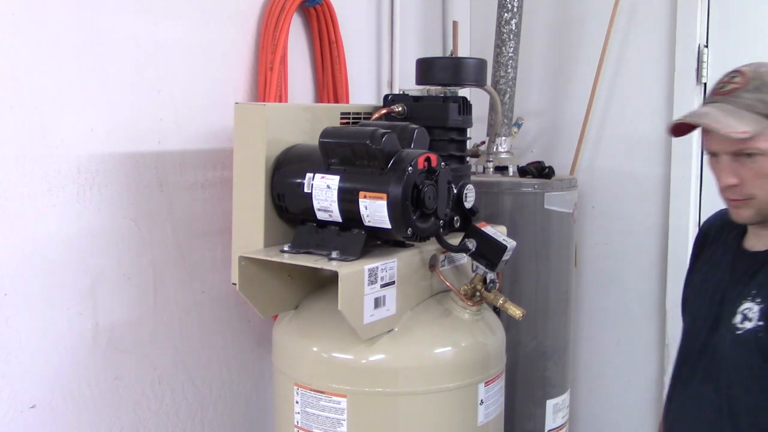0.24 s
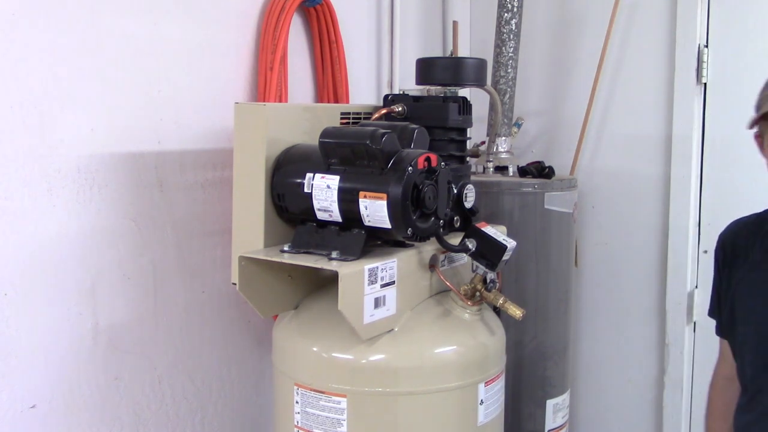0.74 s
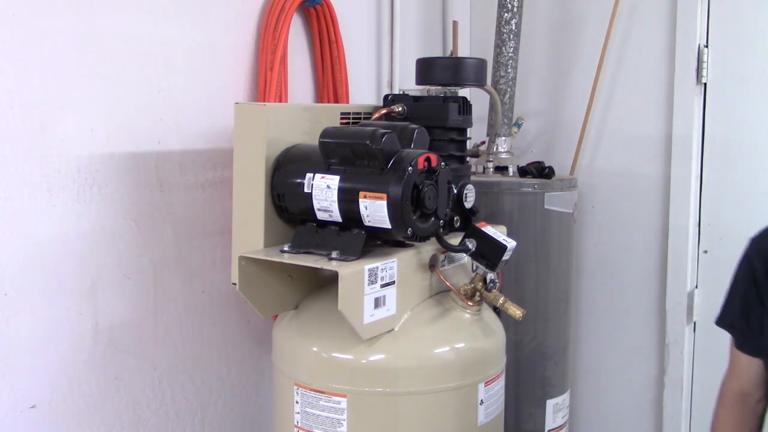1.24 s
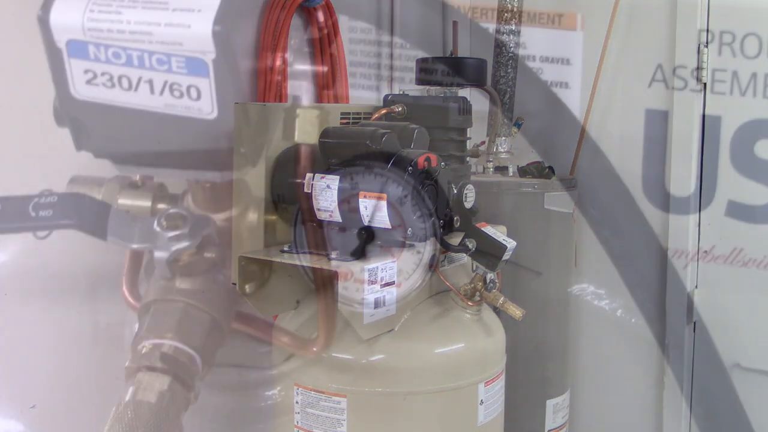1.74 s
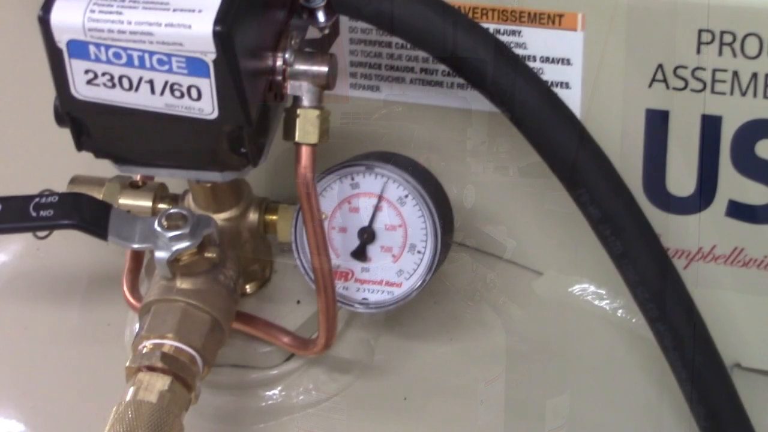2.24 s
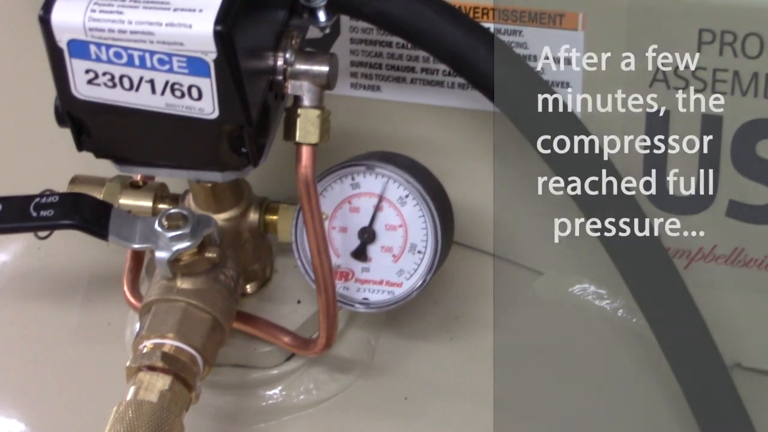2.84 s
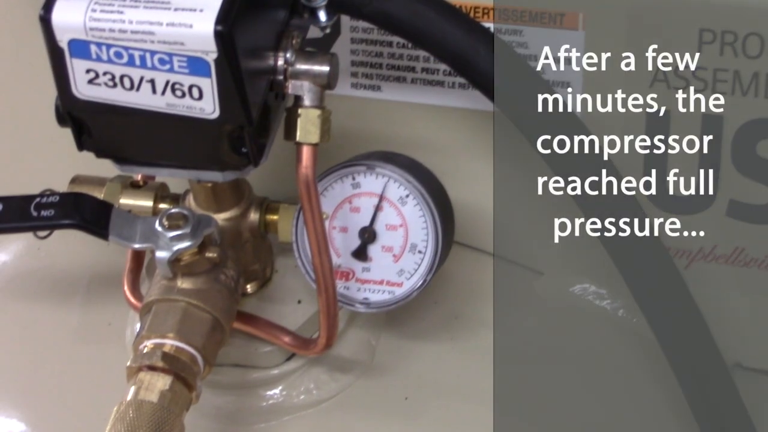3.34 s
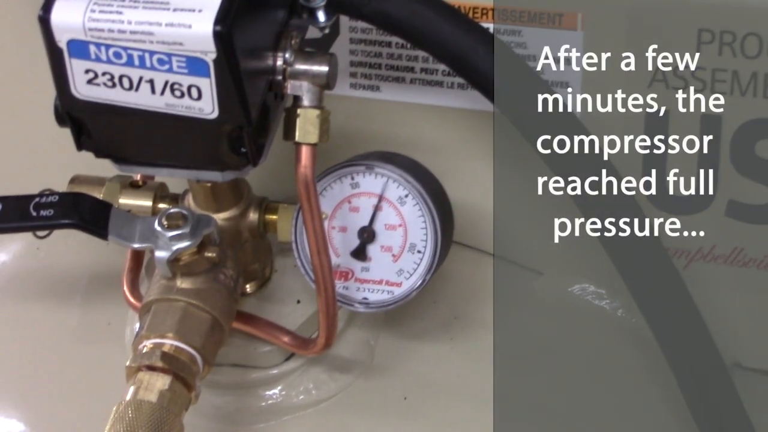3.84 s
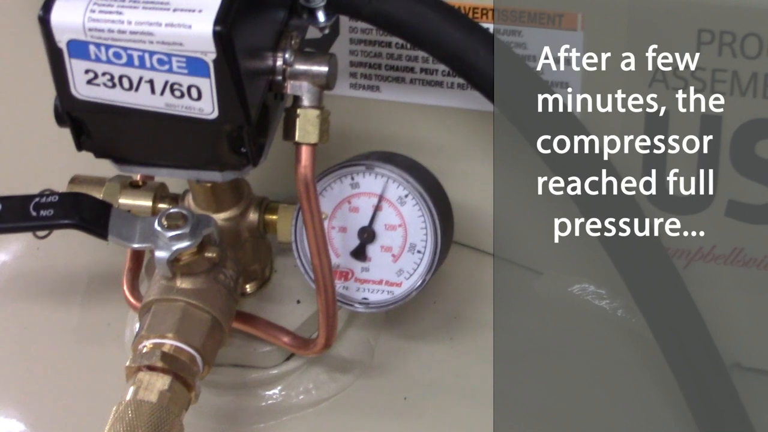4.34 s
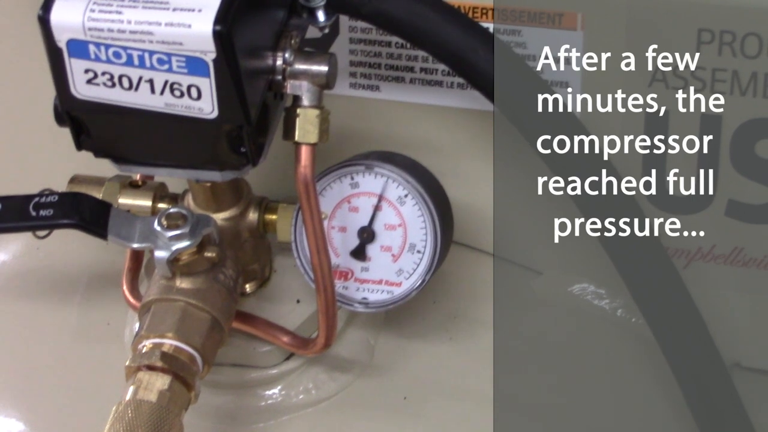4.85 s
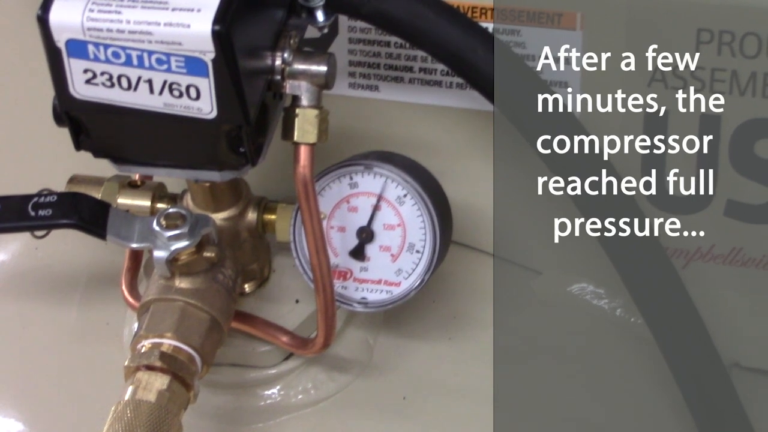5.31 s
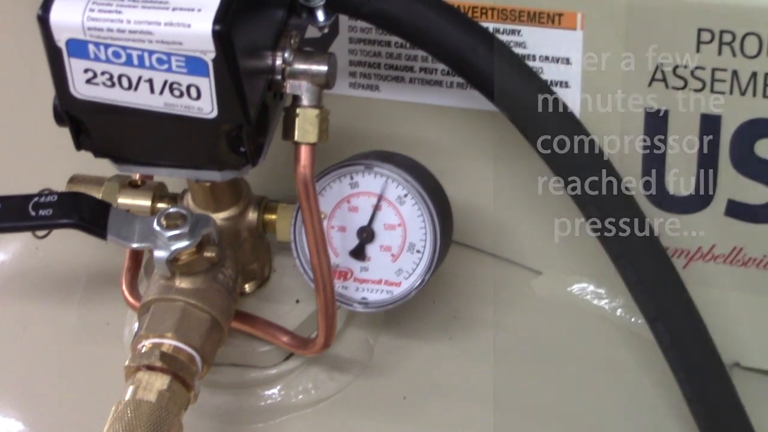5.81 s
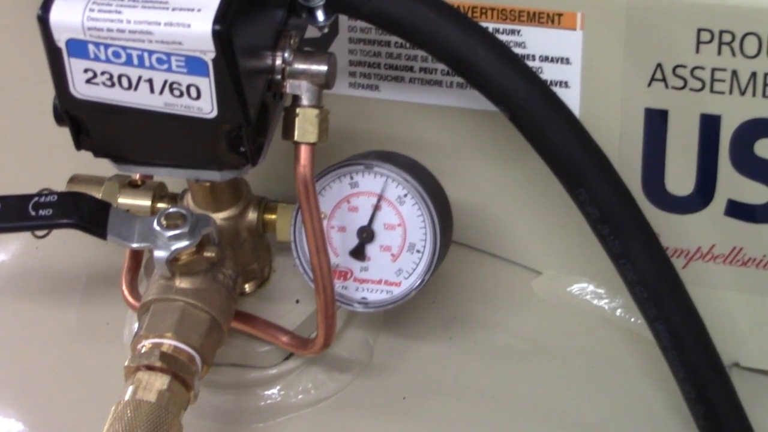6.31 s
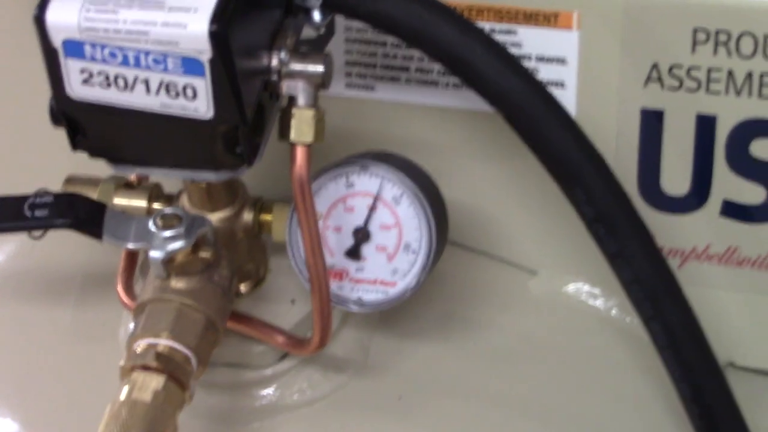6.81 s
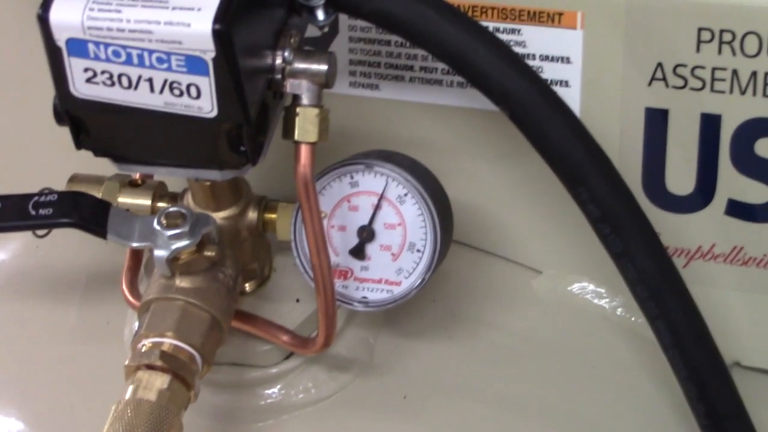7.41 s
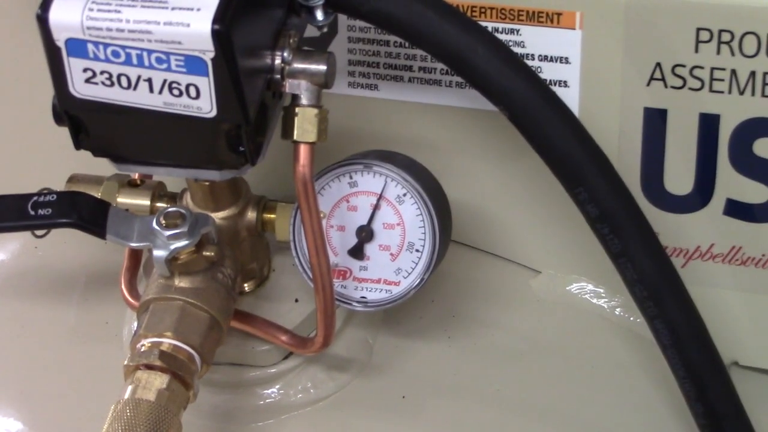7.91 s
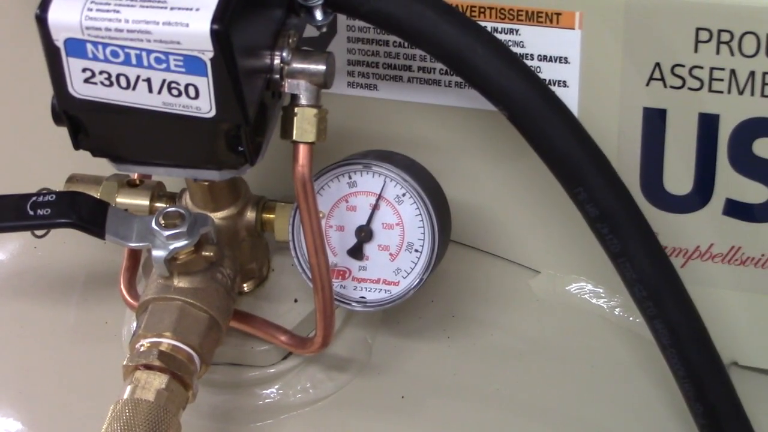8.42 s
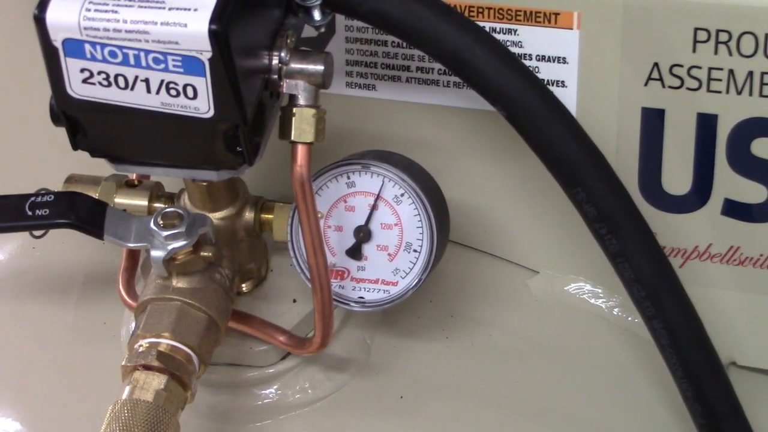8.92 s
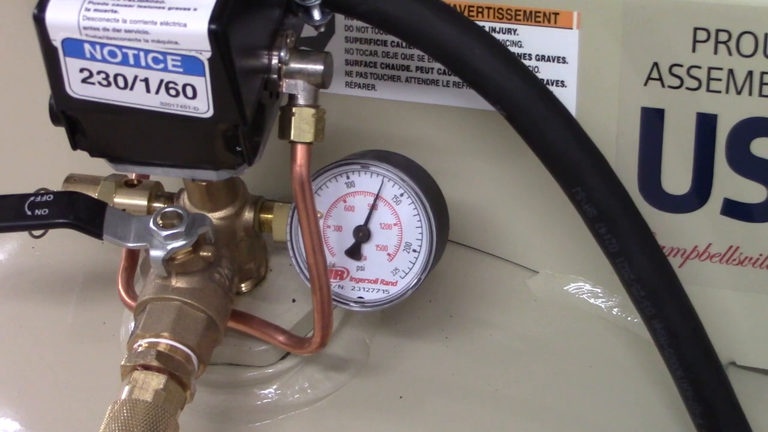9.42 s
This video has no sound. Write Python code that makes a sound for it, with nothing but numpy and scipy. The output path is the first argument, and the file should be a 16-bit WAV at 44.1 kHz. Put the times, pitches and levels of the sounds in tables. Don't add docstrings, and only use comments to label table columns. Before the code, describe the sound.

From 0 seconds an electric piston air compressor is already running loudly in a garage, heard across the room: a steady hammering drone of about 25 turns per second, with slapping valves, rattling metal and broadband clatter. At about 1.9 seconds a tiny click cuts to a close position by the tank; the same drone becomes rougher and more midrange, with faint reed ticks and thin, wavering belt squeals around 5 kilohertz. At 6.6 seconds the motor switches off. Its drone collapses and separate tank thumps alternate with short valve chirps, slowing until a firm knock near 7.4 and small chirps until 7.7. Meanwhile a bright, gritty air hiss bursts out at 6.6, swells slightly, and stays strong from 7.7 to about 9, its upper resonances sinking as pressure falls. It fades rapidly by 9.7, leaving faint building hum.

```python
import sys
import numpy as np
from scipy import signal
from scipy.fft import rfft, irfft, next_fast_len
from scipy.io import wavfile
from scipy.ndimage import uniform_filter1d, minimum_filter1d

SR = 44100
rng = np.random.default_rng(int(sys.argv[2]) if len(sys.argv) > 2 else 0)


def voltage_ratio(level):
    return 10 ** (np.asarray(level, float) / 20)


def wrap_up_sound(samples):
    columns = np.atleast_2d(samples).T
    tamed = np.clip(columns, -1, 1)
    steps = np.round(tamed * 32767).astype(np.int16)
    wavfile.write(sys.argv[1], SR, steps)


N = 426006
T = np.arange(N) / SR

CUT_S, TRIP_S = 1.8662, 6.6095
FAR_HZ, NEAR_HZ = 25.112, 24.728

# (multiple of the crank rate [1], level [dB])
FAR_ORDERS = [(1, -51), (2, -47), (3, -53), (4, -27), (5, -39), (6, -17), (8, -12), (10, -5), (12, -2),
              (13, -13), (14, -8), (16, 0), (18, -9), (19, -12), (20, -10), (21, -9), (22, -8), (23, -15),
              (24, -8), (26, -13), (28, -11), (29, -15), (32, -9), (33, -13), (34, -16), (36, -14),
              (38, -12), (40, -15), (42, -9)]
NEAR_ORDERS = [(8, -11), (9, -7), (10, -4), (11, -8), (12, 0), (13, -15), (14, -1), (15, -10), (16, -2),
               (18, -9), (19, -10), (21, -14), (22, -2), (23, -16), (24, -11), (26, -9), (27, -10),
               (29, -4), (30, -6), (31, -6), (32, -12), (33, -15), (34, -14), (35, -10), (36, -4), (38, -7),
               (40, -11), (42, -12), (43, -10), (44, -8)]
# (multiple
# [1], level [dB])
FAR_PLATES = [(54, -24), (55, -24), (59, -23), (75, -23), (81, -23), (82, -23), (87, -25), (91, -26)]
NEAR_PLATES = [(39, -21), (46, -21), (50, -24), (57, -27), (72, -26), (76, -25), (78, -25), (82, -21),
               (83, -26), (92, -25), (101, -26), (118, -27), (129, -29)]
# (lowest multiples [dB], first radiated multiple [dB], slope [dB per multiple])
FAR_WEAK, NEAR_WEAK = (-32, -17, -.21), (-30, -22, .05)
RADIATES_FROM, LAST_MULTIPLE = 8, 46
DEEPEST_DB = -7
# (crank angle [turns], strength [dB], centre multiple [1], sweep [milliturns per multiple])
FAR_SLAPS = [(0.1781, -5.0, 30.2, 3.54), (0.3402, 5.7, 21.0, -2.85), (0.3616, -0.7, 28.6, 6.84),
             (0.4904, -5.8, 40.9, 4.39), (0.523, 4.1, 12.6, 3.58), (0.5439, 4.6, 17.6, 11.77),
             (0.6526, -2.7, 14.4, 0.34), (0.8903, 0.4, 17.9, 14.0)]
NEAR_SLAPS = [(0.099, 5.9, 42.6, 2.07), (0.1373, 3.7, 37.4, 6.01), (0.2985, -4.1, 38.4, 0.21),
              (0.3757, 3.4, 19.5, 3.67), (0.3915, -0.9, 28.5, -0.72), (0.4075, 3.3, 10.2, 3.91),
              (0.4603, -1.4, 16.5, 7.39), (0.7369, -2.4, 21.1, 6.91), (0.8103, 1.6, 24.6, 3.05)]

# (frequency [Hz], level [dB per Hz])
FAR_RUSH = [(40, -60), (100, -32), (250, 2), (600, -1.5), (1050, -1.5), (1250, -11), (1750, -15.5),
            (2300, -14.5), (3000, -14.5), (4300, -12), (5500, -14), (8000, -21.5), (11000, -31),
            (16000, -41)]
NEAR_RUSH = [(40, -53), (150, -8), (230, -2), (600, 1), (1050, 1.5), (1250, -10), (2000, -14),
             (3000, -16.5), (4300, -18.5), (5500, -15.5), (6400, -21.5), (9000, -27.5), (12900, -35),
             (13400, -37), (16000, -47)]
# (frequency [Hz], width [Hz])
FAR_RINGS = [(1360, 70), (1485, 40), (2050, 80), (2200, 60), (2550, 70), (3350, 90), (3570, 90),
             (4150, 150), (4850, 200)]
NEAR_RINGS = [(2030, 90), (2280, 60), (2490, 60), (2920, 70), (3050, 120), (4690, 60), (5320, 130),
              (6180, 80), (6640, 40), (7130, 120), (8240, 80), (12700, 200), (12900, 300)]

# (time [s], length [s], level [dB])
BELT_SLIPS = [(1.85, 0.054, -52), (2.1, 0.5, -58), (2.79, 0.44, -50.5), (3.58, .06, -53), (3.74, 0.38, -52),
              (4.15, 0.33, -51.5), (4.62, .35, -56), (5.15, 0.21, -56), (5.38, 0.62, -49), (6.0, .38, -53),
              (6.47, 0.17, -55)]
# (frequency [Hz], width [Hz], level [dB])
SQUEAL_TONES = [(5500, 500, -4.5), (5290, 45, 9), (5415, 40, 5.5), (5530, 41, 9), (5760, 38, 10.5),
                (4600, 400, -1)]
GRIP_S, SAG_DB_PER_S, IDLE_SQUEAL_DB = 0.034, -6, -67
# (crank angle [turns], frequency [Hz], width [Hz], level [dB])
TICKS = [(.03, 1980, 440, -41.5), (.05, 9100, 500, -52), (.83, 12800, 900, -71), (.5, 12250, 300, -68)]
TICK_TURNS = 0.021

COAST_S, BRAKE, FIRST_STROKE, VALVE_LAG, STROKE_COUNT = .871, 1.873, .671, .54, 22
BOOM_SPEED, CHIRP_SPEED = .45, .56
# (peak at full speed [dB], peak at rest [dB], pitch at full speed [Hz], pitch at rest [Hz])
BOOM, KNOCK = (-20, -22.5, 310, 146), (-27, -15, 355, 323)
CHIRP_LOW, CHIRP_HIGH = (-22, -30, 706, 730), (-24.5, -27, 920, 902)
# (time [s], peak [dB], pitch [Hz])
LAST_KNOCKS = [
    (7.391, -28.5, 419),
    (7.538, -52, 320),
]
# (time [s], peak [dB], pitch [Hz])
LAST_CHIRPS = [(7.432, -32.5, 804), (7.452, -33, 933), (7.52, -37, 850), (7.56, -39, 810),
               (7.589, -44, 719), (7.672, -37, 844)]
# (frequency [Hz], level [dB], t60 [s])
TANK_MODES = [(226, -7, 0.19), (300, -14, .1), (398, -7.5, 0.14), (539, -12, 0.16)]
HEAD_MODES = [(225, -18, .05), (300, -22, .3), (420, -13, .45), (550, -20, .12)]
VALVE_MODES = [(586, -16, 0.096), (703.4, -12, 0.12), (825, -17.5, 0.2), (950, -11.5, 0.11),
               (1072, -9, 0.062)]

# (time [s], level [dB], emptying [0-1])
BLEED = [
    (6.61, -33, .1),
    (6.8, -30, 0),
    (7.3, -28.5, 0),
    (7.7, -26.5, 0.34),
    (8.1, -26.5, 0.68),
    (8.5, -27, 1),
    (9.02, -27.5, 0.97),
    (9.32, -33, 0.88),
    (9.66, -42.5, 0.7),
]
# (frequency [Hz], width [Hz], level at full pressure [dB], level nearly empty [dB])
TUBE = [(3610, 900, -11.5, -12), (4850, 790, -6, -1), (5620, 750, -14.5, -3), (6890, 1030, -0.5, 0),
        (7980, 340, -10.5, -6.5), (8770, 560, -4, -5), (9760, 980, -6.5, -8.5), (10620, 400, -7.5, -23),
        (11670, 850, -7, -13), (13100, 970, -2.5, -8.5), (15400, 1140, -6.5, -10.5)]
# (frequency [Hz], width [Hz])
NOTCHES = [(3300, 120), (5250, 120), (7400, 180), (10200, 310), (12200, 320), (13950, 340)]
# (frequency [Hz], level [dB])
BREATH = [(60, -25), (200, -12), (560, -8.0), (760, -1.5), (1200, -2.5), (2200, 0.5), (3000, 1), (9000, 5.5),
          (16000, -1)]
# (frequency [Hz], width [Hz])
BREATH_RINGS = [(940, 60), (1160, 74), (2150, 160), (2900, 160)]

# (frequency [Hz], level [dB])
HUM = [(334, -61.5), (736, -58.5), (810, -64), (826, -67)]
# (time [s], gain [dB])
HUM_RISE = [(7.6, -19), (8.03, -8), (8.6, -7.5), (9.66, -8.5)]
# (frequency [Hz], level [dB per Hz])
ROOM_FLOOR = [(30, -105), (100, -99), (300, -99), (800, -94.5), (1500, -93), (4000, -107), (16000, -125)]
# (delay [ms], gain [1])
ECHOES = [(.55, 0.008), (1.3, -0.033), (3.1, 0.087), (7.7, 0.21), (12.9, -0.21), (21.0, 0.17),
          (33.0, -0.26), (47.0, 0.053)]
# (frequency [Hz], side minus mid [dB])
SIDE_DB = [(60, -13), (150, -37), (380, -30.5), (900, -25.5), (1500, -22), (4200, -20.5), (6300, -19),
           (8500, -20), (10800, -17.5), (13000, -21)]


def level(x, db):
    return x * voltage_ratio(db) / np.sqrt(np.mean(x ** 2))


def colour(x, points, rings=(), ring_db=0):
    size = next_fast_len(len(x), True)
    f = np.arange(size // 2 + 1) * SR / size + 1
    hz, db = np.transpose(points)
    curve = voltage_ratio(np.interp(np.log(f), np.log(hz), db))
    lift = 1 + sum(voltage_ratio(ring_db) / (1 + (2 * (f - c) / w) ** 2) for c, w in rings)
    return irfft(rfft(x, size) * curve * lift, size)[:len(x)]


def band(x, hz, width):
    b, a = signal.iirpeak(hz, hz / width, SR)
    return signal.lfilter(b, a, signal.lfilter(b, a, x))


def walk(rate, size=N):
    hold = max(int(SR / rate), 1)
    steps = np.repeat(rng.standard_normal(size // hold + 3), 8)
    ramp = np.convolve(steps, np.bartlett(17) / 8, "same")
    return 0.67 * np.interp(np.arange(size) * 8 / hold + 8, np.arange(len(ramp)), ramp)


def echoes(x):
    out = x + sum(g * np.roll(x, int(ms * SR / 1000)) for ms, g in ECHOES)
    return out / np.sqrt(1 + sum(g * g for _, g in ECHOES))


def garage():
    hum = sum(voltage_ratio(db + 7.5 + 0.52 * walk(6)) * np.sin(2 * np.pi * hz * T) for hz, db in HUM)
    floor = colour(rng.standard_normal(N), ROOM_FLOOR) * np.sqrt(SR / 2)
    return hum * voltage_ratio(np.interp(T, *np.transpose(HUM_RISE))) + floor


def unloader():
    s, db, empty = np.transpose(BLEED)
    db = np.interp(T, s, db)
    empty = np.clip(np.interp(T, s, empty), 0, 1)
    jet = 0
    for hz, w, full, end in TUBE:
        resonance = level(band(rng.standard_normal(N), hz, w), 10 * np.log10(w))
        jet = jet + resonance * voltage_ratio(full + empty * (end - full) + 0.21 * walk(9.8))
    sputter = voltage_ratio(0.26 * walk(25) + 1.3 * walk(70) + 1.6 * walk(900))
    breath = colour(rng.standard_normal(N), BREATH, BREATH_RINGS, ring_db=-6.5)
    hiss = level(jet * sputter, 0) + level(breath, -6.5) * voltage_ratio(-4.5 * empty)
    for hz, w in NOTCHES:
        hiss = .4 * hiss + .6 * signal.lfilter(*signal.iirnotch(hz, hz / w, SR), hiss)
    pop = 1 + 0.74 * np.exp(-np.clip(T - TRIP_S, 0, None) / 0.0034)
    return echoes(hiss) * pop * voltage_ratio(db) * (T > TRIP_S)


def strike(events, modes, own_t60, push_s, glide):
    out, t = np.zeros(N + SR), T[:SR // 2]
    mix = rng.standard_normal((len(events), len(modes)))
    bend = t + glide * 0.0094 * (1 - np.exp(-t / 0.0048))
    for (s, db, hz), chances in zip(events, mix):
        tones = np.sin(2 * np.pi * hz * bend) * 1000 ** (-t / own_t60)
        for (f, d, t60), r in zip(modes, chances):
            mode = np.sin(2 * np.pi * f * (1 + 0.019 * r) * t) * 1000 ** (-t / t60)
            tones += voltage_ratio(d + 1.6 * r) * mode
        tones *= 1 - np.exp(-t / push_s)
        start = int(s * SR)
        out[start:start + len(t)] += voltage_ratio(db) * tones / np.abs(tones).max()
    return out[:N]


def slowing(lag, limit, fast, slow):
    strokes = np.arange(STROKE_COUNT) + FIRST_STROKE + lag
    left = (1 - strokes * BRAKE / (2 * NEAR_HZ * COAST_S)) ** (1 / BRAKE)
    speed = left ** (BRAKE - 1)
    chance = rng.standard_normal((STROKE_COUNT, 2)).T

    def rows(db, rest_db, hz, rest_hz):
        peak = rest_db + (db - rest_db) * speed + 1.1 * chance[0]
        pitch = (rest_hz + (hz - rest_hz) * speed) * (1 + 0.026 * chance[1])
        return np.transpose([TRIP_S + COAST_S * (1 - left), peak, pitch])

    return list(rows(*fast)[speed > limit]), list(rows(*slow)[speed <= limit])


def coasting():
    booms, knocks = slowing(0, BOOM_SPEED, BOOM, KNOCK)
    low, high = slowing(VALVE_LAG, CHIRP_SPEED, CHIRP_LOW, CHIRP_HIGH)
    thumps = strike(booms, TANK_MODES, own_t60=.09, push_s=.001, glide=.15)
    thumps += strike(knocks + LAST_KNOCKS, HEAD_MODES, own_t60=.06, push_s=.001, glide=.06)
    chirps = strike(low + high + LAST_CHIRPS, VALVE_MODES, own_t60=.07, push_s=.004, glide=-.08)
    blows = thumps + voltage_ratio(1.5) * chirps
    tail = rng.standard_normal(SR) * 1000 ** (-T[:SR] / 0.86)
    heard = voltage_ratio(-2.5) * blows + voltage_ratio(-39.0) * signal.fftconvolve(blows, tail)[:N]
    return signal.sosfilt(signal.butter(4, 180, "high", fs=SR, output="sos"), heard)


def ticking(turns):
    out = 0
    for angle, hz, w, db in TICKS:
        ring = level(band(rng.standard_normal(len(turns)), hz, w), db)
        out = out + ring * np.exp(-((turns - angle) % 1) / TICK_TURNS)
    return out


def slipping():
    out = voltage_ratio(IDLE_SQUEAL_DB)
    for s, length, db in BELT_SLIPS:
        edge = np.clip(np.minimum(T - s, s + length - T) / GRIP_S + .5, 0, 1)
        out = out + edge * voltage_ratio(db + SAG_DB_PER_S * np.clip(T - s, 0, length))
    return out * voltage_ratio(1.3 * walk(9))


def belt_squeal():
    voices = sum(voltage_ratio(db) * band(rng.standard_normal(N), hz, w) for hz, w, db in SQUEAL_TONES)
    return level(voices, 2.5) * slipping()


def rush(turns, points, rings, db, repeat, ring_db, beat_db):
    size = int(round(1 / np.mean(np.diff(turns))))
    again = np.interp(turns % 1 * size, np.arange(size + 1), rng.standard_normal(size + 1))
    again = signal.sosfilt(signal.butter(6, [1150, 4200], "band", fs=SR, output="sos"), again)
    fresh = rng.standard_normal(len(turns)) * voltage_ratio(beat_db * np.cos(4 * np.pi * turns))
    return level(colour(repeat * again + echoes(fresh), points, rings, ring_db), db)


def all_orders(strong, weak):
    deep_db, db, slope = weak
    tones = {}
    for k in range(1, LAST_MULTIPLE + 1):
        if k < RADIATES_FROM:
            tones[k] = deep_db + DEEPEST_DB * (k < 4)
        else:
            tones[k] = db + slope * (k - RADIATES_FROM)
    tones.update(dict(strong))
    return list(tones.items())


def pump(hz, orders, slaps, span, db, wobble_db):
    size = len(T[span])
    turns = hz * T[span] + 0.0026 * walk(3.03, size=size)
    out = 0
    for k, tone_db in orders:
        cycle = 0
        for angle, slap_db, centre, sweep in slaps:
            strength = voltage_ratio(slap_db) / (1 + ((k - centre) / 8) ** 2)
            delay_turns = k * angle - sweep * (k - centre) ** 2 / 2000
            cycle = cycle + strength * np.exp(-2j * np.pi * delay_turns)
        gain = voltage_ratio(tone_db + wobble_db * (0.5 + k / 60) * walk(14, size=size))
        out = out + gain * np.cos(2 * np.pi * k * turns + np.angle(cycle))
    return level(out, db), turns


def running():
    out, cut, trip = np.zeros(N), int(CUT_S * SR), int(TRIP_S * SR)
    far, near = slice(0, cut), slice(cut, trip + SR + SR // 4)

    orders = all_orders(FAR_ORDERS, FAR_WEAK) + FAR_PLATES
    tones, turns = pump(FAR_HZ, orders, FAR_SLAPS, far, db=-24.0, wobble_db=0.5)
    noise = rush(turns, FAR_RUSH, FAR_RINGS, db=-30.5, repeat=0.87, ring_db=-2.5, beat_db=-1.0)
    motor = voltage_ratio(-50.5) * np.sin(2 * np.pi * 120 * T[far])
    out[far] = tones + noise + motor

    orders = all_orders(NEAR_ORDERS, NEAR_WEAK) + NEAR_PLATES
    tones, turns = pump(NEAR_HZ, orders, NEAR_SLAPS, near, db=-23.5, wobble_db=1.5)
    noise = rush(turns, NEAR_RUSH, NEAR_RINGS, db=-34, repeat=1.29, ring_db=-5.0, beat_db=-0.7)
    after = np.clip(T[near] - TRIP_S, 0, None)
    moving = noise + belt_squeal()[near] + ticking(turns)
    out[near] = tones * np.exp(-after / 0.06) + moving * voltage_ratio(-32 * after ** 1.67)
    out[near] += (out[cut - 1] + .14 - out[cut]) * np.exp(-(T[near] - CUT_S) / .00008)
    return out


def scene():
    mid = garage() + unloader() + coasting() + running()
    scatter = rng.standard_normal(1500) * np.exp(-T[:1500] / 0.008)
    scattered = signal.fftconvolve(mid, scatter / np.linalg.norm(scatter))[:N]
    side = colour(scattered, SIDE_DB) - 0.035 * mid * (T > TRIP_S)
    return np.array([mid + side, mid - side])


def low_pass(x):
    return signal.sosfilt(signal.butter(12, 15900, fs=SR, output="sos"), x)


def record(dry):
    need = np.minimum(1, .165 / (np.abs(dry).max(axis=0) + 1e-9))
    gain = uniform_filter1d(minimum_filter1d(need, size=221), size=221)
    top = signal.ellip(16, .2, 90, 15750, fs=SR, output="sos")
    mix = signal.sosfilt(top, dry * gain)
    return low_pass(mix)


dry = scene()
out = record(dry)
wrap_up_sound(out)
```